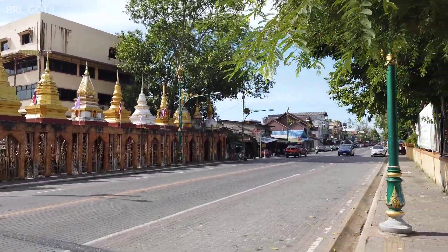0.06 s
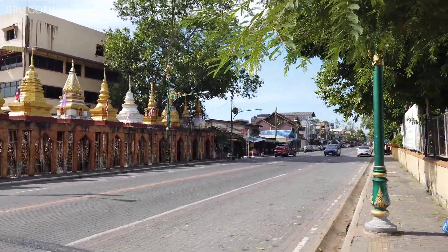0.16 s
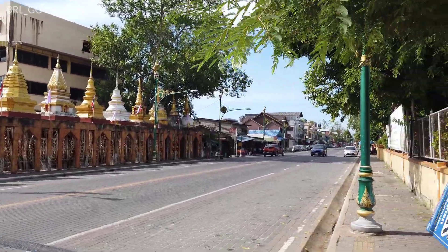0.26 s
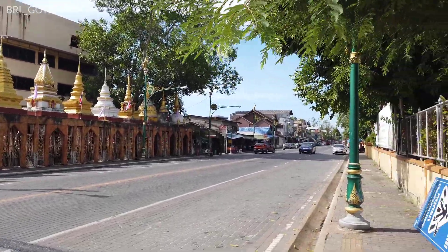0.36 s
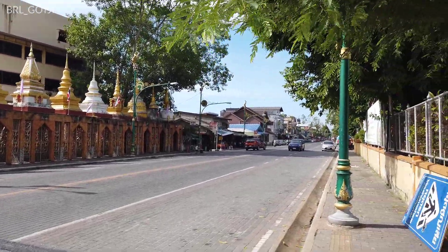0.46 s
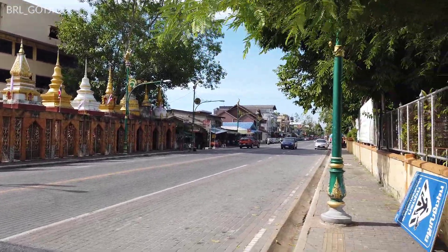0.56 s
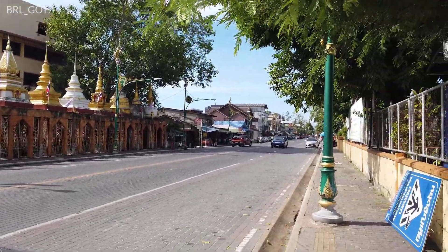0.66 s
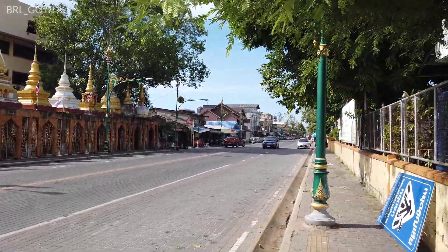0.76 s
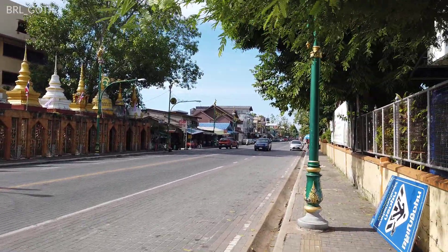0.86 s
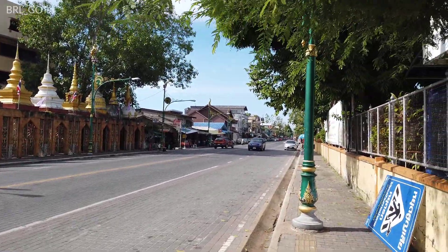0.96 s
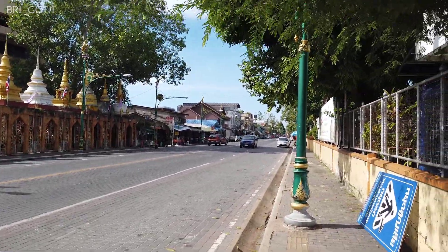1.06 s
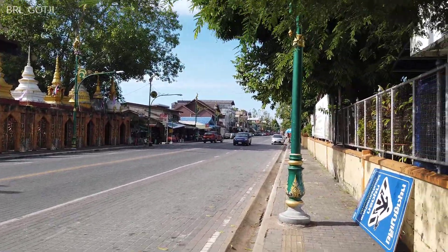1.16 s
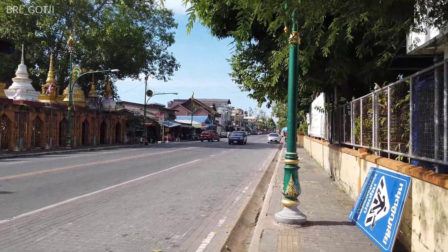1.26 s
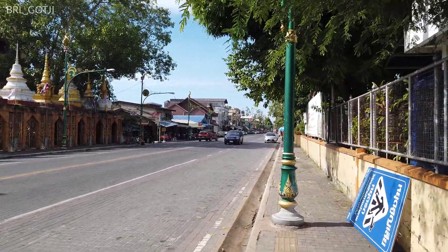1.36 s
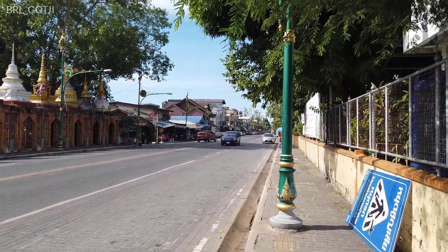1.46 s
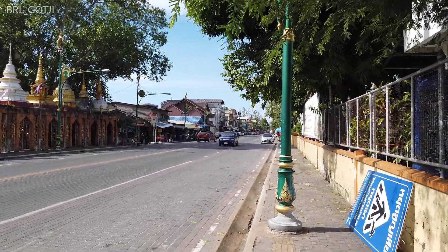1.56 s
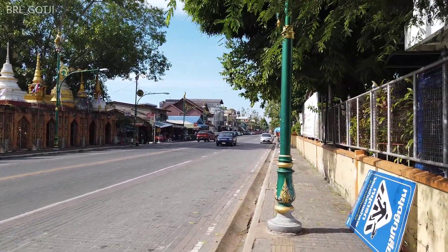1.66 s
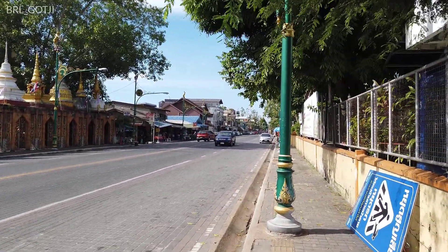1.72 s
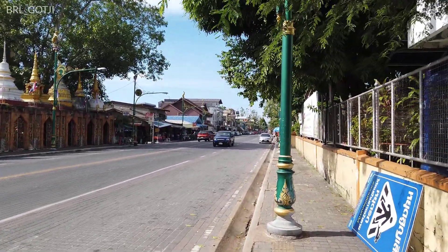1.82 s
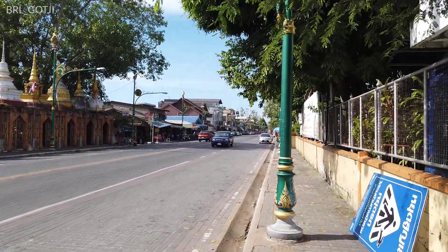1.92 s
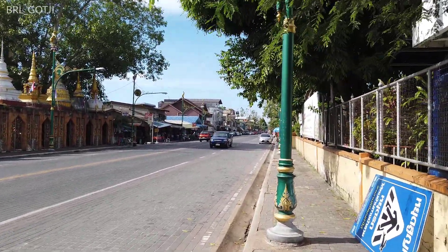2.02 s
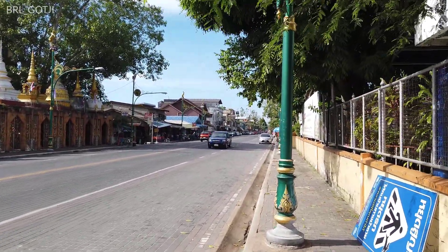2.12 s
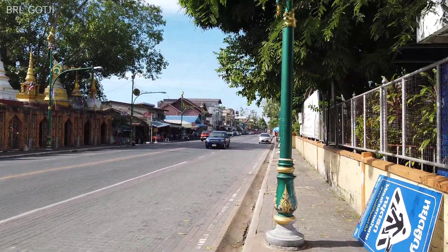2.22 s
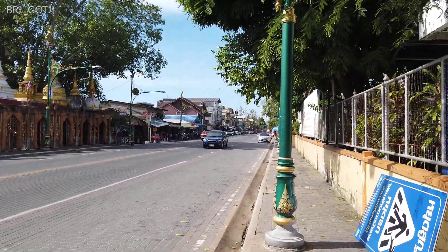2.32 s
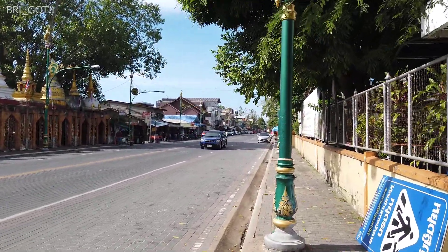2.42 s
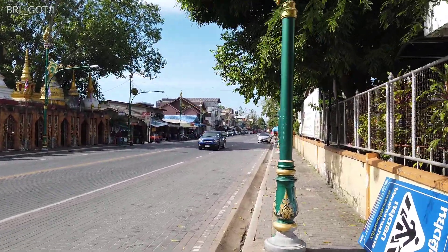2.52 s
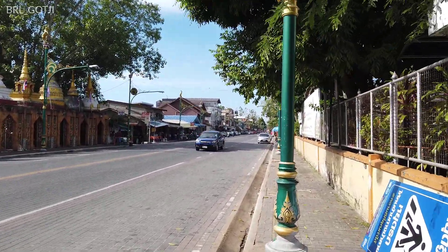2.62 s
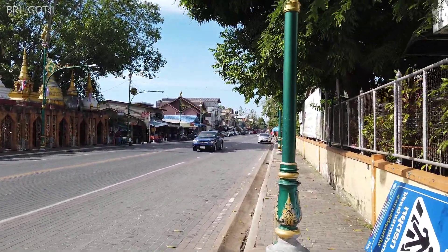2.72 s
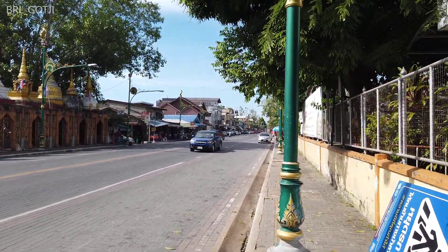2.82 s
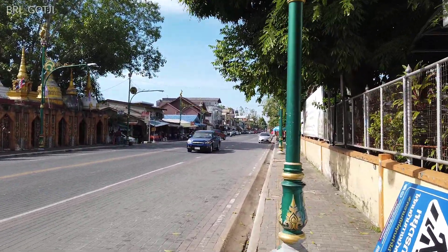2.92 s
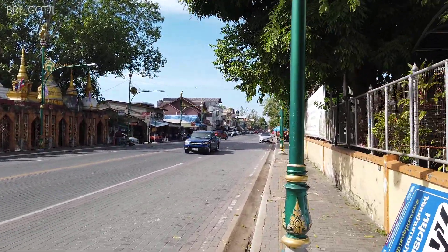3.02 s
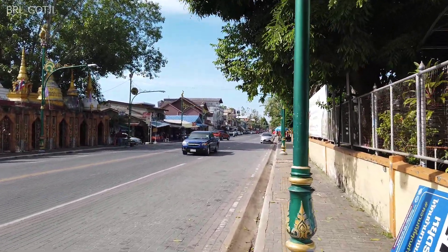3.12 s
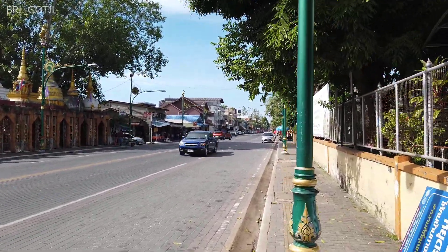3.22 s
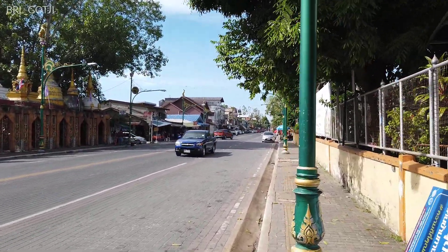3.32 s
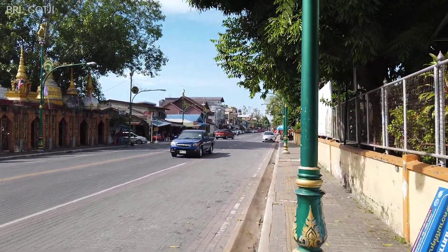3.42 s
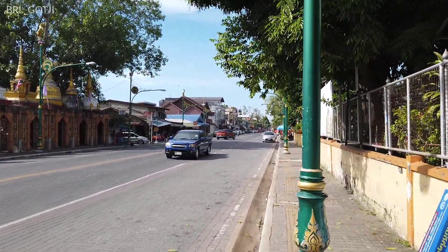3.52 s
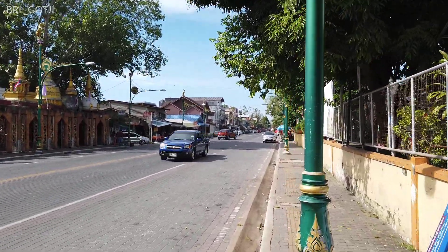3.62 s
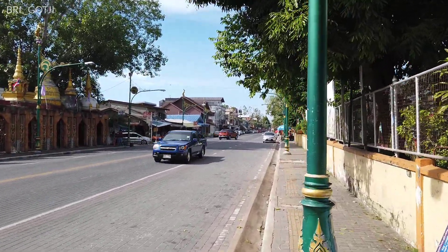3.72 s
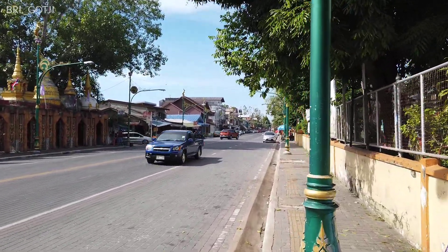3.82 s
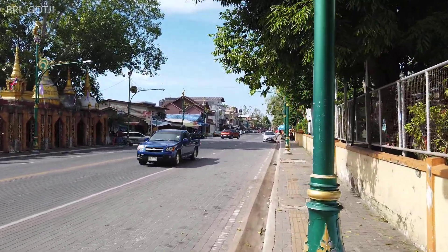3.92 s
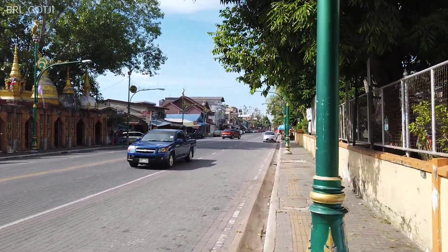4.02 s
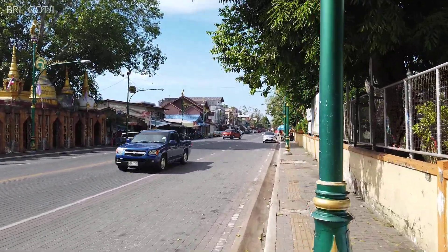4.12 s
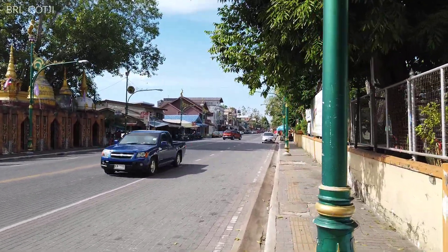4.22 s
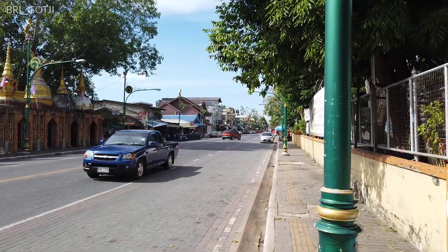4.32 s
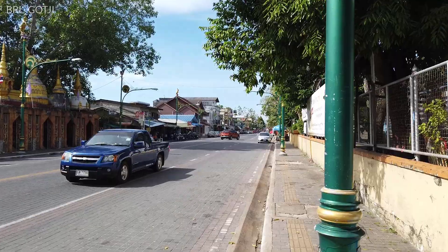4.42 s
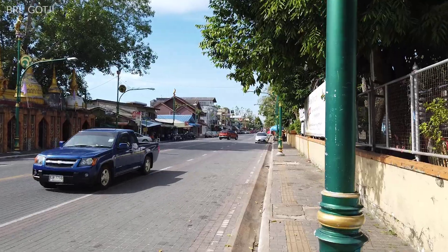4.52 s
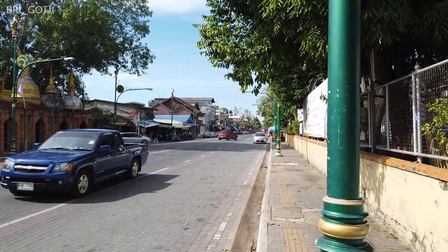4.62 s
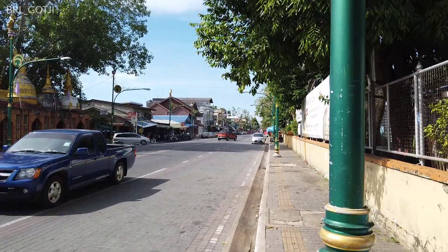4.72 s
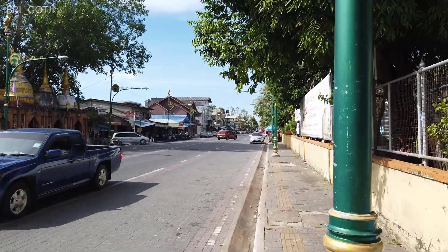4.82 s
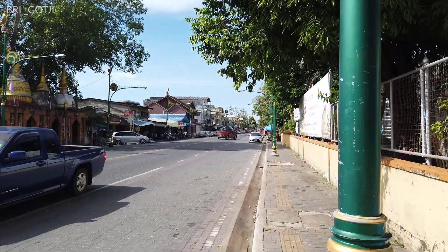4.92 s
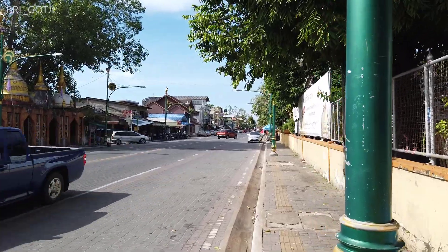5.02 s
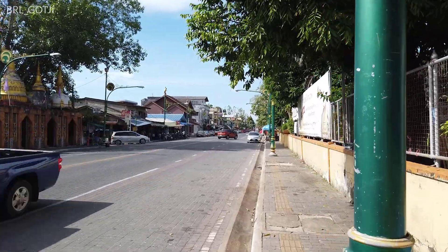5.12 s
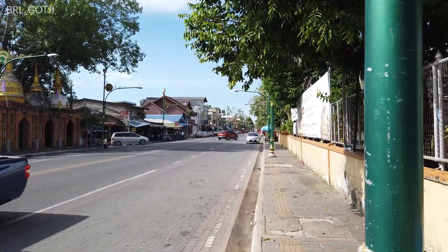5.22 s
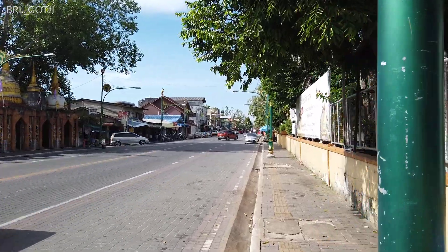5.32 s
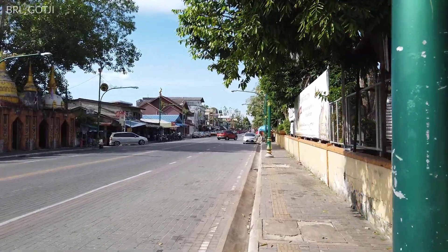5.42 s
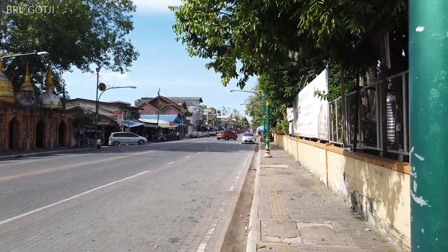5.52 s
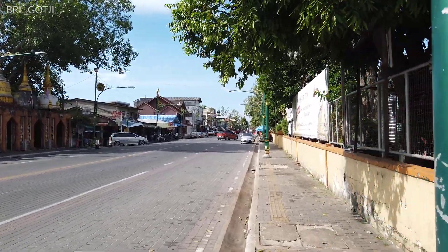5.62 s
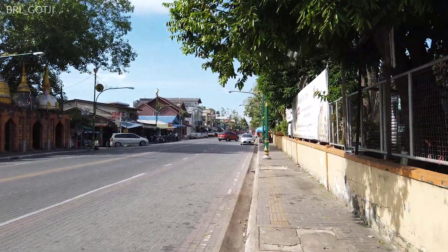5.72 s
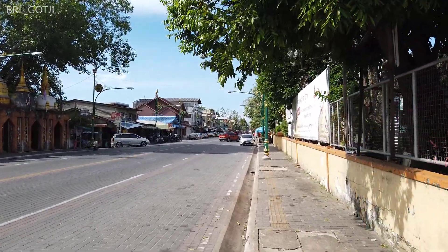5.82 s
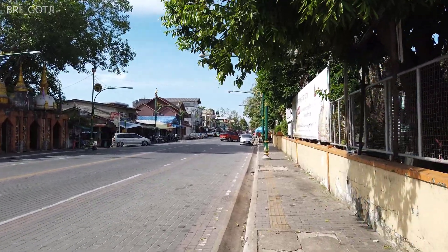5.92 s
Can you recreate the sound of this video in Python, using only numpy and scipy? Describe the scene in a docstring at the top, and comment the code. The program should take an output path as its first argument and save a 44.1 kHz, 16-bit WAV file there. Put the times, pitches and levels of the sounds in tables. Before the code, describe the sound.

A stereo roadside scene of about six seconds, with low idling throb, distant traffic wash and gentle bass wind buffets throughout. At the start a nearby vehicle is pulling away: its exhaust drones until about 1.1 s, dips, then drones again until 2.7 s, rising slightly in pitch. A fluttering treble hiss peaks around 0.6 s and drops near 2.3 s, alongside a thin, flickering whistle that eventually glides down and vanishes before 4 s. Around 3 s it is calmer, with a faint far growl. Tyre hum stirs at 3.5 s, then a diesel pickup swells quickly. Tyre roar peaks at 5 s, while engine clatter, low exhaust and gritty ticking peak near 5.5 s. From 4.96 s six short squeaks recur rapidly, strongest near 5.5 s. Dull knocks land around 5.36 and 5.85 s, with a soft hiss from 5.7 s. Deep underbody roar continues to the end.

```python
"""Tyre roar, engine clatter and a short recurring squeak swell as a diesel pickup passes close on a town road.
Before it, another vehicle draws away with a droning exhaust, a pulsing hiss and a thin whistle.
An idling engine, far traffic and wind lie underneath; knocks and short hisses echo faintly from roadside walls.
Engines are harmonic series locked to a shaft; tyres, clatter, hiss and rumble are filtered noise;
each passing part rises and falls with its distance on a straight line."""
import sys
import numpy as np
from scipy import signal
from scipy.fft import rfft, irfft, next_fast_len
from scipy.io import wavfile
from scipy.ndimage import uniform_filter1d, map_coordinates

SR = 44100
rng = np.random.default_rng(int(sys.argv[2]) if len(sys.argv) > 2 else 0)


def digitize_waveform(pressure):
    """Quantize a signal to 16-bit integers and store it at the path in sys.argv[1].

    Rows of a 2-D input are taken as channels; values are limited to [-1, 1].
    """
    field = np.atleast_2d(pressure).T
    bounded = np.clip(field, -1, 1)
    quanta = np.round(bounded * 32767).astype(np.int16)
    wavfile.write(sys.argv[1], SR, quanta)


N = 262836


def amp(db):
    """Level in decibels to amplitude gain."""
    return 10 ** (np.asarray(db) / 20)


def unit(x):
    """Scale to rms 1."""
    return x / np.sqrt(np.mean(x ** 2) + 1e-20)


def clock():
    """The time of each sample in seconds."""
    return np.arange(N) / SR


def along(points, hz):
    """Interpolate (Hz, value) points on a logarithmic frequency axis."""
    f, v = np.transpose(points)
    return np.interp(np.log(hz + 1), np.log(f + 1), v)


def curve(points):
    """Interpolate (s, value) points in time, one value per sample."""
    s, v = np.transpose(points)
    return np.interp(clock(), s, v)


def wobble(rate):
    """A smooth random modulation with rate knots a second."""
    knots = rng.standard_normal(int(N * rate / SR) + 4)
    return map_coordinates(knots, [clock() * rate])


def filtered(x, response):
    """Linear filtering: multiply the spectrum of x by a response of frequency."""
    m = next_fast_len(N + SR // 2)
    return irfft(rfft(x, m) * response(np.fft.rfftfreq(m, 1 / SR)), m)[..., :N]


def coloured(x, spectrum):
    """Spectral shaping by (Hz, dB) points."""
    return filtered(x, lambda hz: amp(along(spectrum, hz)))


def ports(pair):
    """Interchannel coherence: two unrelated signals become left and right, most alike near 500 Hz."""
    # stereo width of the sound field: frequency_hz, side_over_mid_db
    side_ratio = [(30, -4.5), (60, -11), (120, -16), (250, -30.5), (500, -40), (900, -20.5), (1400, -14.5),
                  (2800, -9.5), (5000, -14), (7000, -6.5), (9000, -7), (10300, 0.5), (12000, -4),
                  (15000, -2)]

    def mid_and_side(hz):
        ratio = amp(along(side_ratio, hz))
        return np.array([np.ones_like(hz), ratio]) / np.hypot(1, ratio)

    mid, side = filtered(pair, mid_and_side)
    return unit(np.array([mid + side, mid - side]))


def across_ports(pair):
    """Interaural-style delay: sound arriving at a slant reaches the right port a little earlier."""
    # arrival of the pickup's sound: time_s, right_lead_microseconds
    bearing = [(2.5, 9.1), (4.0, 45), (4.7, 58.8), (5.6, 42.4), (5.96, 19.3)]
    half_lag = curve(bearing) * 1e-6 * SR / 2  # in samples
    places = [np.arange(N) - half_lag, np.arange(N) + half_lag]
    return np.array([map_coordinates(x, [at], order=5, mode="nearest") for x, at in zip(pair, places)])


def rush(spectrum, patchy_db):
    """Broadband turbulence: coloured stereo noise of rms 1 with time-frequency patches of random gain."""
    z = signal.stft(rng.standard_normal((2, N)), nperseg=512)[2]
    field = uniform_filter1d(rng.standard_normal(z.shape[1:]), size=4, axis=0)  # over frequency
    field = uniform_filter1d(field, size=9, axis=1)  # over time
    pair = signal.istft(z * amp(patchy_db * unit(field)), nperseg=512)[1][:, :N]
    return ports(coloured(pair, spectrum))


def cyclic(turns, spectrum):
    """Periodicity: moving parts repeat one noise every cycle, which gives a fine comb of lines."""
    one_turn = rng.standard_normal((2, int(N / turns[-1])))
    pair = np.array([map_coordinates(x, [turns % 1 * len(x)], mode="grid-wrap") for x in one_turn])
    return ports(coloured(pair, spectrum))


def resonate(x, modes):
    """Modal resonance: two signals through (Hz, width Hz, dB) modes, as stereo of rms 1."""
    def response(f):
        total = 0
        for k, (centre, width, db) in enumerate(modes):
            mode = 1j * f * width / (centre * centre - f * f + 1j * f * width)
            total = total + (-1) ** k * amp(db) * mode
        return total / (1 + (f / 4500) ** 4)  # treble roll-off

    return ports(filtered(x, response))


def orders(turns, table):
    """Fourier series of a periodic shaft: one sine for each (multiple, dB) row."""
    return sum(np.sqrt(2) * amp(db) * np.sin(2 * np.pi * (round(k) * turns + rng.random())) for k, db in table)


def swells(rows):
    """Half-sine envelopes from (start s, length s, dB) rows."""
    t = clock()
    return sum(amp(db) * np.sin(np.pi * np.clip((t - s) / length, 0, 1)) for s, length, db in rows)


def spell(start, end, attack, release):
    """An envelope with a rounded attack, a hold and a rounded release."""
    t = clock()
    return np.sin(np.pi / 2 * np.clip(np.minimum((t - start) / attack, (end - t) / release), 0, 1))


def chirps(rows, width, waver_hz):
    """Frequency-modulated tones under Gaussian envelopes, from (s, Hz, dB) rows."""
    t = clock()
    drift = np.cumsum(waver_hz * wobble(250)) / SR
    out = 0
    for s, hz, db in rows:
        envelope = np.exp(-np.minimum(((t - s) / width) ** 2, 50))
        out = out + amp(db) * envelope * np.sin(2 * np.pi * (hz * t + drift))
    return out


def passing(part):
    """Distance law of a part on a straight line, in dB; it radiates differently ahead and behind."""
    s, db, width, ahead_db, behind_db = part
    t = clock() - s
    return db - np.where(t < 0, ahead_db, behind_db) * np.log10(np.hypot(1, t / width))


def pickup():
    """Superposition: one firing cycle drives the exhaust and clatter, with rolling and underbody noise."""
    firing_hz = 43.6
    # the rate falls along an S-curve; half the drop is reached at its middle
    drop_hz, drop_middle_s, drop_width_s = 4.2, 5.96, .4
    rate = firing_hz - drop_hz * (1 + np.tanh((clock() - drop_middle_s) / drop_width_s)) / 2
    firings = np.cumsum(rate + 0.0998 * wobble(10)) / SR
    bursts = diesel_knocks(firings, decay=0.482, scatter_db=1.23)
    slanting = engine_clatter(firings, bursts) + grit() + tread_hum() + tyre_roar(bursts)
    return pickup_exhaust(firings) + across_ports(slanting) + underbody()


def tyre_roar(bursts):
    """Rolling noise: a broadband rush, slightly modulated by the engine's firing."""
    # roar spectrum: frequency_hz, relative_level_db
    colour = [(300, -26), (500, -21), (700, 1.5), (850, 2), (1020, -3), (1330, 0), (1520, -6), (1740, -3),
              (2200, -9), (3200, -12.5), (3900, -23.5), (6000, -61.5), (12000, -62)]
    # pass: loudest_s, level_db, half_width_s, ahead_loss_db_per_tenfold, behind_loss_db_per_tenfold
    part = (5, -24, 0.4142, 27.5, 23)
    return amp(passing(part) + 0.8 * wobble(45)) * unit(4.5 + bursts) * rush(colour, patchy_db=3.0)


def tread_hum():
    """Resonance: noise excites the tread's hum, which swells once on the way in."""
    # tread modes: frequency_hz, width_hz, relative_level_db
    modes = [(1188, 143, 8.5), (1833, 75, -4)]
    # pass: loudest_s, level_db, half_width_s, ahead_loss_db_per_tenfold, behind_loss_db_per_tenfold
    part = (5, -32.5, 0.2658, 18.5, 38)
    # extra swell: start_s, length_s, level_db
    extra = [(3.4, 0.372, -41.5)]
    level = (amp(passing(part)) + swells(extra)) * amp(wobble(9))
    return level * resonate(rng.standard_normal((2, N)), modes)


def diesel_knocks(firings, decay, scatter_db):
    """Impulsive combustion: each firing is a burst that dies quickly; the four cylinders differ."""
    # knock strength of each cylinder: relative_level_db
    strengths = [-0.97, -2.16, 2.5, 1.48]
    count = firings.astype(int)
    scatter = scatter_db * rng.standard_normal(count[-1] + 1)[count]
    size_db = np.take(strengths, count, mode="wrap") + scatter
    phase = firings % 1  # decay and onset are fractions of one firing period
    return unit(amp(size_db) * np.exp(-phase / decay) * (1 - np.exp(-phase / 0.091)))


def engine_clatter(firings, bursts):
    """Forced vibration: firing bursts ring the block's modes and modulate a rasp of moving parts."""
    # engine block modes: frequency_hz, width_hz, relative_level_db
    block = [(876.3, 33, 2.5), (1644.3, 61.5, 5.5), (1900, 52, -13), (2561, 180, -5.5), (2990, 330, -6.5),
             (5320, 310, -13.5)]
    # rasp spectrum: frequency_hz, relative_level_db
    colour = [(300, -13.5), (450, -10), (560, -0.5), (680, -6.5), (1350, -4.5), (1700, -5.5), (2080, -3),
              (2250, -12.5), (3250, -7), (3900, -18.5), (5500, -22.5), (6600, -29), (10000, -28.5),
              (15500, -70.5)]
    # passes: loudest_s, level_db, half_width_s, ahead_loss_db_per_tenfold, behind_loss_db_per_tenfold
    block_part = (5.5, -26, 0.4562, 38, 35)
    rasp_part = (5.5, -21.5, 0.3162, 38.5, 33)
    ring = resonate(bursts * rng.standard_normal((2, N)), block)
    machinery = unit(rush(colour, patchy_db=2.5) + 0.676 * cyclic(firings, colour))
    rasp = unit(2.34 + bursts) * machinery
    return amp(passing(block_part)) * ring + amp(passing(rasp_part)) * rasp


def pickup_exhaust(firings):
    """Harmonic radiation: the exhaust note is a series on the firing rate."""
    # exhaust note: multiple_of_firing_rate, relative_level_db
    series = [(1, -6), (2, -12), (3, 0), (4, -14), (5, -12), (6, -14)]
    # pass: loudest_s, level_db, half_width_s, ahead_loss_db_per_tenfold, behind_loss_db_per_tenfold
    part = (5.5, -24, 0.3115, 29.5, 29)
    return amp(passing(part) + 0.76 * wobble(8)) * orders(firings, series)


def underbody():
    """Low broadband noise: the underbody's roar hardly fades once it has drawn level."""
    # roar spectrum: frequency_hz, relative_level_db
    colour = [(40, -23), (90, -1.5), (170, 2.5), (220, -1), (300, -3), (400, -10), (560, -12.5), (800, -26),
              (2000, -39.5)]
    # pass: loudest_s, level_db, half_width_s, ahead_loss_db_per_tenfold, behind_loss_db_per_tenfold
    part = (5.5, -22.5, 0.42, 29.5, -1)
    return amp(passing(part)) * rush(colour, patchy_db=2.0)


def grit():
    """Shot noise: small stones tick under the tread at random moments and strengths."""
    # tick spectrum: frequency_hz, relative_level_db
    colour = [(1200, -7.5), (1700, 8), (3200, 2.5), (4200, -13), (5400, 1.5), (6500, -19), (10000, -19.5),
              (15500, -34)]
    # pass: loudest_s, level_db, half_width_s, ahead_loss_db_per_tenfold, behind_loss_db_per_tenfold
    part = (5.5, -32.5, 0.2754, 54.5, 22)
    ticks_per_s, spread_db = 260, 1.5
    hit = rng.random((2, N)) < ticks_per_s / SR
    sizes = amp(spread_db * np.minimum(rng.exponential(size=(2, N)), 2)) * hit
    sizes = sizes * rng.choice([-1, 1], (2, N))
    length = SR // 200  # 5 ms
    burst = rng.standard_normal(length) * amp(-60 * np.linspace(0, 1, length))
    ticks = signal.fftconvolve(sizes, burst[None], axes=1)[:, :N]
    return amp(passing(part)) * ports(coloured(ticks, colour))


def squeak():
    """Periodic friction: a turning part of the pickup squeaks once a turn."""
    # successive squeaks: pitch_hz, peak_level_db
    notes = [(2063, -25.5), (1976, -25.5), (1973, -21.5), (2058, -15.5), (2017, -16.5), (2002, -18.5)]
    start_s, period_s = 4.962, .1836
    rows = [(start_s + k * period_s, hz, db) for k, (hz, db) in enumerate(notes)]
    return chirps(rows, width=.008, waver_hz=35)


def body_knocks():
    """Damped vibration: loose parts of the pickup give dull knocks of decaying resonant noise."""
    # knocks: start_s, centre_hz, level_db
    knocks = [(4.991, 800, -33), (5.357, 857, -14.5), (5.642, 2400, -18), (5.755, 1765, -28),
              (5.829, 1860, -21), (5.846, 872, -14.5)]
    out = np.zeros((2, N))
    for s, hz, db in knocks:
        age = np.maximum(clock() - s, 0)
        panel = resonate(rng.standard_normal((2, N)), [(hz, 0.21 * hz, 0)])
        out = out + amp(db - 60 * age / 0.065) * (1 - np.exp(-age / 0.00123)) * panel
    return out


def departing():
    """Superposition: a steadily quickening engine cycle drives drone, overtones, body noise and hiss."""
    cycle_hz, gain_hz_per_s = 35.1, 0.61
    turns = np.cumsum(cycle_hz + gain_hz_per_s * clock() + 0.0987 * wobble(10)) / SR
    engine = exhaust_drone(turns) + exhaust_overtones(turns) + leaving_body(turns)
    return engine + leaving_tyres() + pulsing_hiss(turns)


def exhaust_drone(turns):
    """Harmonic radiation: spells of drone, strongest at three times the cycle rate."""
    # drone: multiple_of_cycle_rate, relative_level_db
    series = [(2, -12.5), (3, 0)]
    # spells under load: start_s, end_s, release_s, level_db
    spells = [(-0.45, 1.088, 0.488, -15), (1.17, 2.71, 0.188, -17.5)]
    attack_s, sag_db_per_s = 0.556, 6.5
    load = 0
    for s, end, release, db in spells:
        load = load + amp(db - sag_db_per_s * (clock() - s)) * spell(s, end, attack_s, release)
    return load * amp(1.66 * wobble(18)) * orders(turns, series)


def exhaust_overtones(turns):
    """Random modulation: uneven firing makes each exhaust overtone flutter on its own."""
    # overtones: multiple_of_cycle_rate, relative_level_db
    series = [(4, -11), (5, -7.5), (6, -10.5), (7, -12)]
    # pass: loudest_s, level_db, half_width_s, ahead_loss_db_per_tenfold, behind_loss_db_per_tenfold
    part = (-0.1049, -28, 0.95, 17, 10.5)
    ease_off_s, ease_off_db_per_s = 2.156, 15
    level_db = passing(part) - ease_off_db_per_s * np.maximum(clock() - ease_off_s, 0)
    flutter = sum(amp(2.72 * wobble(12)) * orders(turns + 0.0265 * wobble(14), [row]) for row in series)
    return amp(level_db) * flutter


def leaving_body(turns):
    """Amplitude modulation: engine noise pulses once a cycle."""
    # engine noise spectrum: frequency_hz, relative_level_db
    colour = [(90, -32), (190, -1), (310, -6.5), (470, -5), (750, -8.5), (950, -10), (1600, -10),
              (2700, -11), (3500, -9), (3950, -17), (10500, -26.5), (15500, -23)]
    # pass: loudest_s, level_db, half_width_s, ahead_loss_db_per_tenfold, behind_loss_db_per_tenfold
    part = (0.1056, -25, 0.6244, 28.5, 40.5)
    machinery = unit(rush(colour, patchy_db=2.5) + .5 * cyclic(turns, colour))
    return amp(passing(part) + 0.8 * np.cos(2 * np.pi * turns)) * machinery


def leaving_tyres():
    """Resonance: noise excites the hum of the departing tyres."""
    # tyre modes: frequency_hz, width_hz, relative_level_db
    modes = [(475, 83, 0), (1004, 209, 2), (1644, 450, -4)]
    # pass: loudest_s, level_db, half_width_s, ahead_loss_db_per_tenfold, behind_loss_db_per_tenfold
    part = (0.54, -33, 0.4279, 39.5, 22)
    return amp(passing(part)) * resonate(rng.standard_normal((2, N)), modes)


def pulsing_hiss(turns):
    """Amplitude modulation: treble noise pulses once an engine cycle, then drops quickly in level."""
    # hiss spectrum: frequency_hz, relative_level_db
    colour = [(2500, -6.5), (4000, -7), (5000, -1), (7500, -2), (10200, -0.5), (11200, -7.5), (13500, -9.5),
              (15500, -46)]
    # pass: loudest_s, level_db, half_width_s, ahead_loss_db_per_tenfold, behind_loss_db_per_tenfold
    part = (0.6134, -32, 0.5856, 80, 29.5)
    stop_s, stop_length_s, drop_db = 2.255, 0.156, 11.5
    level_db = passing(part) - drop_db * np.clip((clock() - stop_s) / stop_length_s, 0, 1)
    pulse_db = 1.0 * np.cos(2 * np.pi * turns) + 0.52 * wobble(16.46)
    return amp(level_db + pulse_db) * rush(colour, patchy_db=2.5)


def whistle():
    """Heterodyning: slow noise on a moving carrier gives a flickering narrow band that ends gliding down."""
    # carrier: time_s, pitch_hz
    pitch = [(.3, 6220), (1.4, 6425), (1.95, 6387), (2.25, 6720), (2.65, 6620), (2.9, 6340), (3.6, 5615)]
    # pass: loudest_s, level_db, half_width_s, ahead_loss_db_per_tenfold, behind_loss_db_per_tenfold
    part = (0.7171, -39, 0.2, 34, 21)
    # flares: start_s, length_s, level_db
    flares = [(1.55, 0.546, -46.5), (2.1, 0.228, -54.5), (2.79, 0.14, -65), (3.03, 0.27, -63)]
    start_s, end_s, fade_s, flicker_db = 0.19, 3.86, 0.122, 0.5
    level = amp(passing(part) + flicker_db * wobble(8.247)) * spell(start_s, end_s, fade_s, fade_s)
    half_width_hz = 100
    flutter = filtered(rng.standard_normal((2, 2, N)), lambda f: 1 / (1 + (f / half_width_hz) ** 2))
    phase = 2 * np.pi * np.cumsum(curve(pitch)) / SR
    band = ports(flutter[0] * np.cos(phase) + flutter[1] * np.sin(phase))
    return (level + swells(flares)) * band


def puffs():
    """Enveloped noise: short treble hisses swell and die."""
    # hisses: start_s, length_s, level_db
    rows = [(.12, 0.53, -39), (2.06, 0.107, -41), (2.08, 0.299, -45.5), (3.95, .6, -55.5),
            (5.735, 0.0595, -41.5), (5.7, 0.524, -40.5)]
    # hiss spectrum: frequency_hz, relative_level_db
    colour = [(4000, -38.5), (7000, -1.5), (9500, -3.5), (11200, -1.5), (13200, -3.5), (14500, -3.5),
              (15500, -35)]
    return swells(rows) * rush(colour, patchy_db=2)


def high_pips():
    """Brief tones: faint, wavering high pips."""
    # pips: time_s, pitch_hz, peak_level_db
    rows = [(3.222, 10820, -49), (4.298, 10890, -39.5)]
    return chirps(rows, width=0.0097, waver_hz=70.5)


def street(x):
    """Reverberation: the walls answer with noise whose decay time depends on frequency."""
    # decay to -60 dB: frequency_hz, t60_s
    decay = [(200, 0.39), (2000, 0.94), (10000, 0.37)]
    hz, t, z = signal.stft(rng.standard_normal((2, SR // 2)), SR, nperseg=256)
    fading = z * amp(-60 * t / along(decay, hz)[:, None])
    tail = signal.istft(fading, SR, nperseg=256)[1]
    return signal.fftconvolve(x, tail / np.linalg.norm(tail[0]), axes=1)[:, :N]


def idling_engine():
    """Low harmonics: two wavering tones an octave apart."""
    # idle tones: pitch_hz, relative_level_db
    tones = [(28.5, -5), (57, 0)]
    out = 0
    for hz, db in tones:
        level = np.sqrt(2) * amp(-37.5 + db + 0.66 * wobble(3.82))
        out = out + level * np.sin(2 * np.pi * np.cumsum(hz + 0.299 * wobble(4.05)) / SR)
    return out


def far_traffic():
    """Distant broadband sources: low rumble, a growl from traffic further off and a wide wash."""
    # rumble, growl and wash spectra: frequency_hz, relative_level_db
    rumble_colour = [(15, -14), (30, 6.5), (55, -0.5), (75, -1.5), (110, -0.5), (150, -3), (185, 1.5),
                     (250, -6), (330, -22.5), (600, -48.5)]
    growl_colour = [(25, -11), (55, 5), (80, 2), (110, 1), (140, -13), (190, -1.5), (250, -9.5), (330, -16),
                    (600, -46.5), (2000, -120)]
    wash_colour = [(160, -16), (300, -1.5), (470, -2.5), (650, -7.5), (900, -8), (1600, -9.5), (2200, -14),
                   (3300, -15.5), (3900, -21.5), (5600, -25.5), (6800, -34), (10500, -26.5), (13500, -46.5),
                   (15000, -51)]
    # growl: start_s, length_s, level_db
    growls = [(2.85, 2.17, -29.5)]
    rumble = amp(-33.5 + 0.64 * wobble(5.23)) * rush(rumble_colour, patchy_db=2.5)
    growl = swells(growls) * rush(growl_colour, patchy_db=0.5)
    wash = amp(-38.5 + 0.44 * wobble(3.44)) * rush(wash_colour, patchy_db=2.0)
    return rumble + growl + wash


def wind():
    """Turbulent pressure: light buffets of wind on the microphone are swells of bass noise."""
    # buffets: start_s, length_s, level_db
    buffets = [(0.03, 0.312, -23.5), (1.45, 0.67, -27), (3.25, 0.218, -26.5), (4.68, 0.164, -28.5),
               (5.1, 0.46, -33.5)]
    # spectrum: frequency_hz, relative_level_db
    colour = [(15, -21.5), (35, 1), (55, -6.5), (90, -8), (300, -35), (1000, -90)]
    return swells(buffets) * rush(colour, patchy_db=-0.5)


def scene():
    """Superposition: both vehicles and the small echoing sounds over the background."""
    rattles = across_ports(squeak() + body_knocks())
    small = rattles + puffs() + high_pips()
    vehicles = pickup() + departing() + whistle()
    background = idling_engine() + far_traffic() + wind()
    return vehicles + small + amp(-12.0) * street(small) + background


def record(dry):
    """Linear response: the microphone ports colour the treble, and nothing passes above the band limit."""
    # port response: frequency_hz, gain_db
    case = [(8500, 0), (9600, 0), (10400, 2), (11200, -4), (13000, -0.5), (15500, -6)]
    top_hz = 15650
    return filtered(dry, lambda hz: amp(along(case, hz)) * (hz < top_hz))


dry = scene()
out = record(dry)
digitize_waveform(out)
```